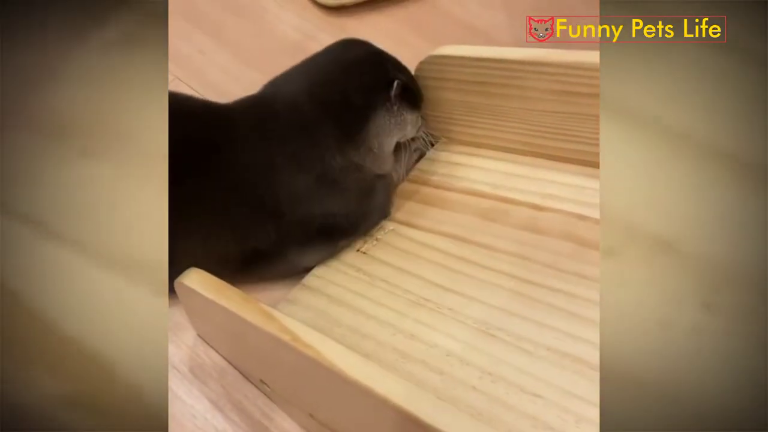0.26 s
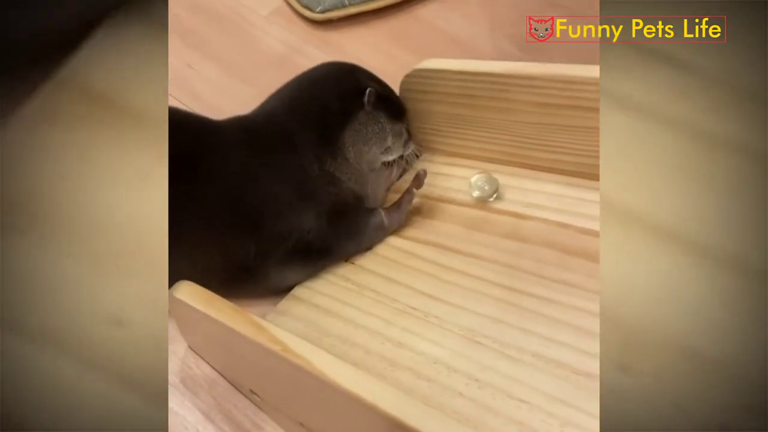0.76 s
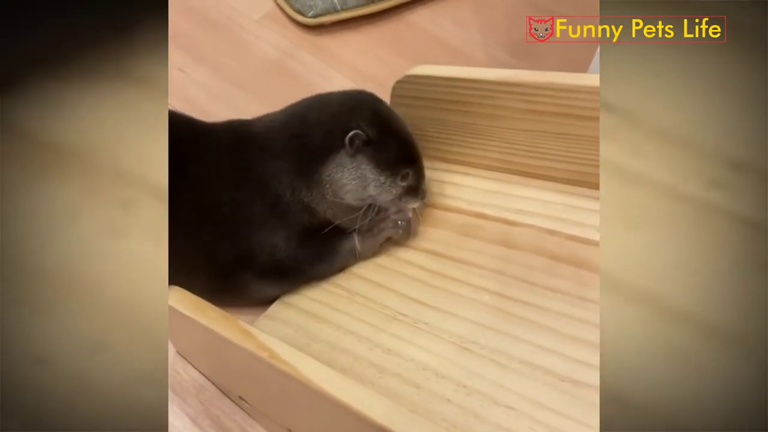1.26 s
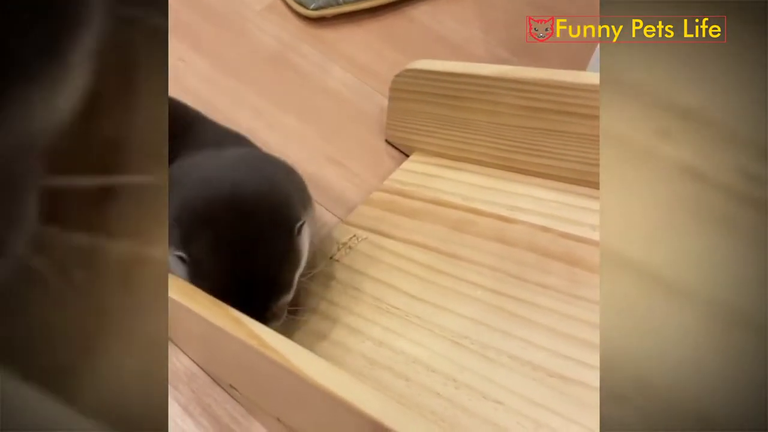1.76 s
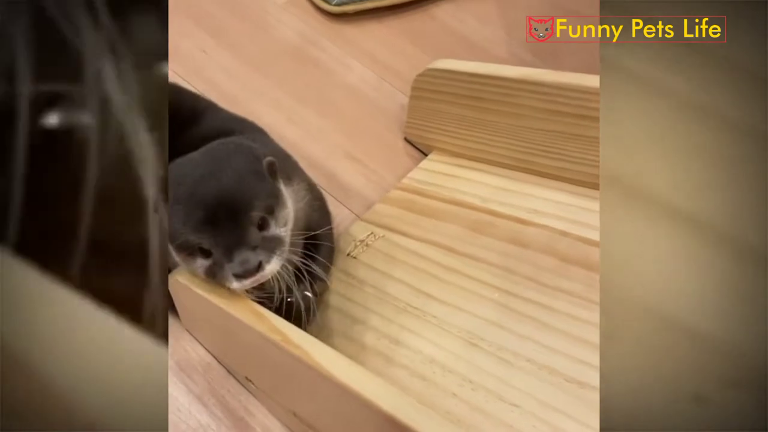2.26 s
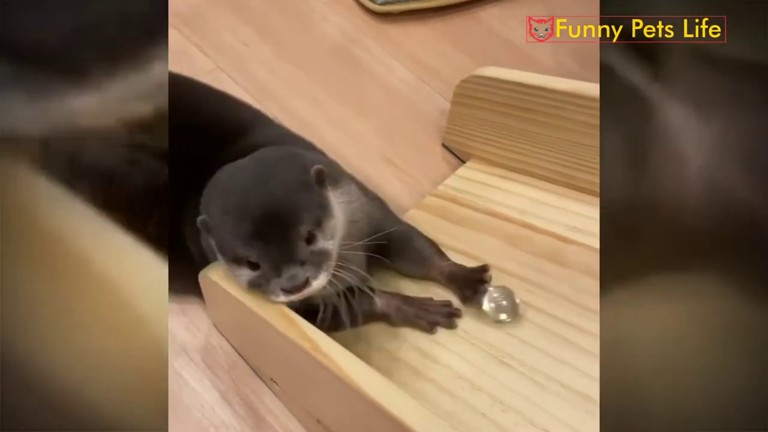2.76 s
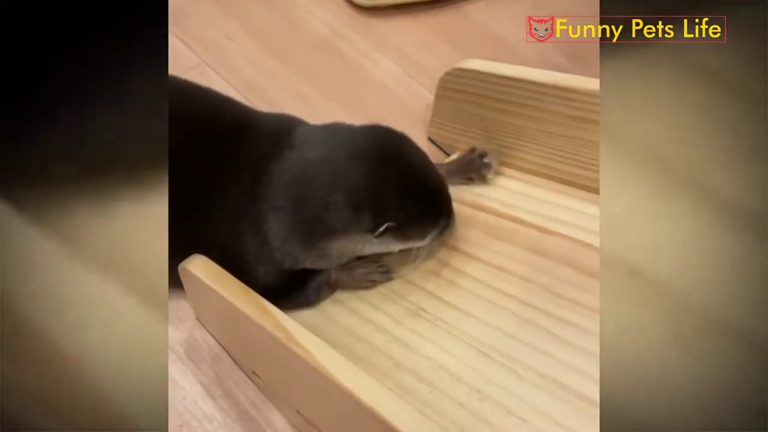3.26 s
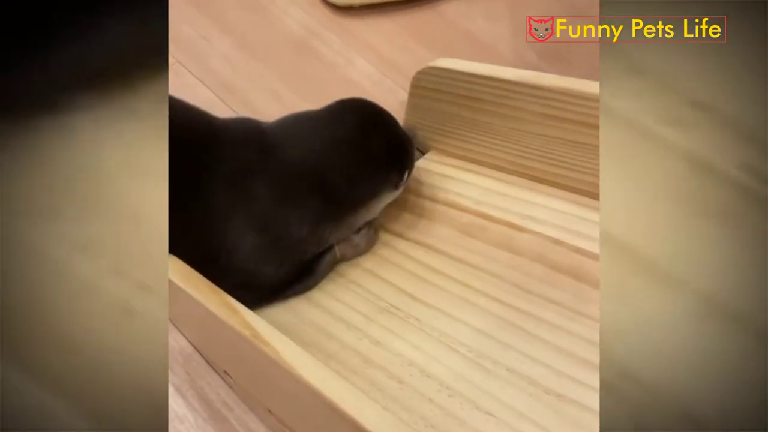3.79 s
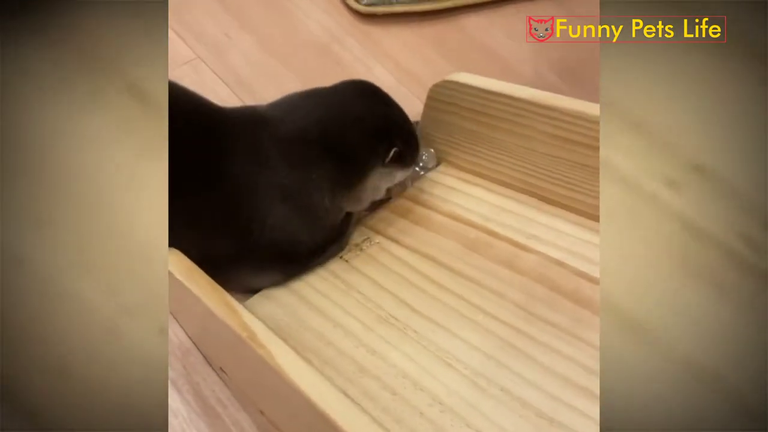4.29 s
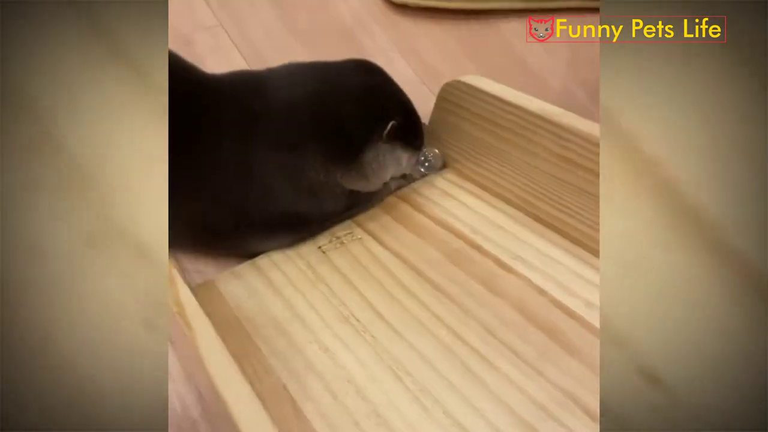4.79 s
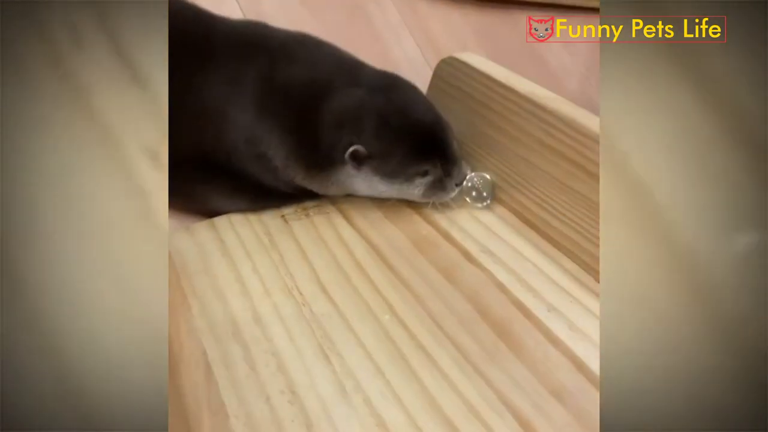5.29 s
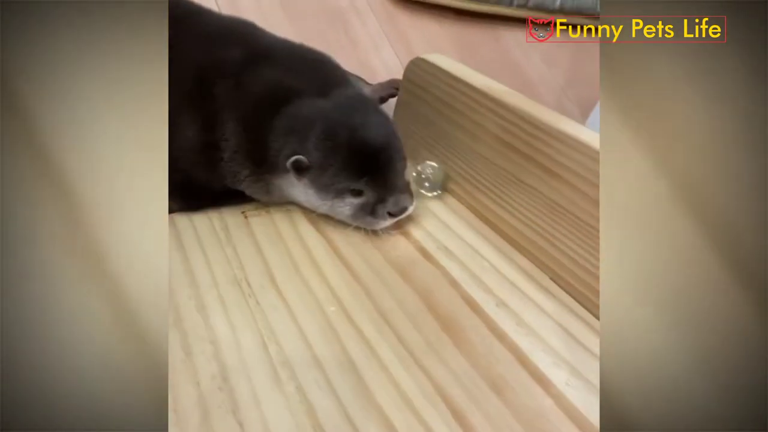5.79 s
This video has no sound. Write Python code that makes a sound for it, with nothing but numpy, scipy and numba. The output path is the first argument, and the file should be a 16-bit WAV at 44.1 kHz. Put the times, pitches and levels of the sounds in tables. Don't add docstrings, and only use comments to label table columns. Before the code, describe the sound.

Close up in a small quiet room, a hard glass ball rattles on resonant wood. Two bright clicks come early, a few woody knocks follow, and the board rumbles and rings as the ball is pushed. It grows louder near the halfway point, breaks into separate sharp knocks with quiet gaps, then rolls in short bursts. Dry claw scrapes and faint fur rustle run underneath.

```python
import sys
import numpy as np
from scipy import signal
from scipy.fft import rfft, irfft, next_fast_len
from scipy.io import wavfile
from scipy.ndimage import uniform_filter1d
from numba import njit

SR = 44100
rng = np.random.default_rng(int(sys.argv[2]) if len(sys.argv) > 2 else 0)


def master_out(mix):
    frames = np.transpose(np.atleast_2d(mix))
    ceiling = np.clip(frames, -1, 1)
    pcm = np.round(ceiling * 32767).astype(np.int16)
    wavfile.write(sys.argv[1], SR, pcm)


def gain_from_db(level_db):
    decades = np.asarray(level_db, float) / 20
    return 10 ** decades


N = 266212
HZ = np.fft.rfftfreq(next_fast_len(N), 1 / SR) + 1

# frequency in Hz, level in dB per Hz.
ROOM_TONE = [(12, -36), (20, -20.5), (360, 0.5), (447, -36), (527, -6.5), (1160, -13.5), (1950, -26),
             (5200, -30), (8260, -29), (10300, -45.5), (13500, -43.5)]
ROOM_TONE_DB, HUM_DB = -56, -58

# peak in seconds,
# rise in seconds, fall in seconds, level in dB, paw weight in dB.
ROLLS = [(0.018, 0.073, 0.13, -26.5, -8.5), (.11, 0.074, 0.13, -32, -12),
         (.32, 0.046, 0.081, -45.5, 1.5), (.59, 0.1, 0.088, -33.5, 6.5),
         (0.686, 0.144, 0.012, -30, -1.5), (0.822, 0.037, 0.17, -32, -5.5),
         (.885, 0.15, 0.059, -37.5, 7), (.95, 0.048, 0.047, -36.5, 9), (1.098, 0.082, 0.1, -29.5, 1),
         (1.289, 0.037, .2, -18.5, -1.5), (1.349, 0.11, 0.14, -25, 6.5),
         (1.44, 0.25, 0.041, -27, -9), (1.62, 0.046, 0.12, -31, -2), (1.712, 0.26, 0.1, -30, 1.5),
         (1.78, 0.044, 0.75, -52, 0.5), (2.065, 0.049, 0.21, -43, -2), (2.144, 0.1, 0.077, -43, 2),
         (2.349, 0.11, 0.15, -36, -3), (2.51, .12, .1, -43.5, -11), (2.618, 0.098, 0.13, -29, -9),
         (2.736, 0.13, 0.16, -26.5, 0.5), (2.918, 0.15, 0.34, -28, 2.5),
         (3.039, 0.11, 0.048, -22, -1), (3.154, .035, 0.17, -16.5, -1.5),
         (3.235, 0.15, 0.058, -29.5, -7), (3.43, .15, 0.4, -38, -10), (3.47, 0.094, 0.096, -51, -13),
             (3.525, 0.086, 0.14, -45, -5), (3.95, .05, .08, -54.5, -7), (4.847, 0.045, 0.046, -28, -9),
             (4.879, 0.054, 0.034, -40, 7.5), (5.023, 0.084, 0.087, -27.5, 0.5),
             (5.061, 0.091, 0.38, -37, 3), (5.374, 0.18, 0.16, -45.5, -4), (5.519, 0.43, 0.02, -48, -7),
             (5.698, 0.043, 0.11, -29, 3.5), (5.754, 0.0055, 0.14, -22, 0.5),
             (5.85, 0.17, 0.11, -32.5, 5.5), (5.893, .012, 0.083, -22, -1), (5.96, .02, 0.029, -47, 3),
             (6.025, 0.035, .1, -30, 1.5)]
# frequency in Hz, width in Hz, level in dB.
MIDDLE_TONES = [(244, 96, 0.5), (340.3, 70, 6), (520, 10, 8), (656, 44, 9), (776, 71, 5.5), (1034, 43, -4),
                (1390, 25, -17), (1660, 52, -3.5), (2170, 80, -16.5)]
RIM_TONES = [(232.4, 74, -2), (380, 16, -6.5), (521.3, 15, 8), (993, 120, -8), (1341, 18, 1.5),
             (1580, 58, -15), (2060, 31, -20), (2540, 58, -39), (2920, 81, -59), (3100, 25, -40.5)]
RIM_FROM_S = 3.6
# time in seconds, centre in Hz.
SLIDE = [
    [(.5, 495), (.636, 673), (.992, 684), (1.05, 392), (1.16, 394), (1.21, 486), (1.382, 396), (1.45, 537)],
    [(2.05, 469), (2.188, 509), (2.31, 820), (2.39, 580), (2.51, 660), (2.65, 543), (2.75, 344),
     (3.066, 316), (3.24, 322)],
]
SLIDE_DB = -2.5
ROLL_RASP_DB, ROLL_HISS_DB = -15, -34.5

# peak in seconds, rise in seconds, fall in seconds, level in dB.
SCRATCHES = [(.005, .05, 0.11, -44), (0.14, .015, 0.029, -38.5), (0.252, 0.11, 0.21, -63.5),
             (.33, 0.14, 0.082, -50.5), (.59, 0.055, 0.061, -53), (1.301, 0.05, 0.36, -41.5),
             (1.714, 0.12, 0.04, -45.5), (1.8, .1, 0.2, -57), (2.14, 0.6, 0.034, -66),
             (2.35, 0.049, 0.083, -55), (2.619, .13, 0.25, -53), (2.74, 0.27, 0.075, -56),
             (3.0, 0.13, .1, -50.5), (3.16, 0.085, 0.37, -44.5), (4.0, .035, 0.08, -59),
             (4.11, .025, 0.014, -50), (4.298, .1, 0.19, -58.5), (4.6, 0.18, 0.28, -55.5),
             (4.769, 0.9, 0.091, -55), (5.023, 0.043, 0.065, -50.5), (5.37, 0.197, 0.15, -70.5),
             (5.65, 0.037, 0.33, -54.5), (5.753, 0.011, 0.086, -44.5), (5.8, .03, 0.12, -44.5),
             (5.893, 0.035, .05, -46), (6.018, 0.012, 0.018, -34.5)]
# frequency in Hz, level in dB per Hz.
CLAW_HISS = [(1760, -3.5), (3000, 1), (4430, -5), (4900, -4.5), (7760, -9.5), (9970, -14.5), (12000, -25),
             (12800, -44), (13500, -34.5)]
SCRATCH_LOW_DB = 1.5
# peak in seconds, rise in seconds, fall in seconds, level in dB.
SHIFTS = [(.6, .2, 0.13, -72), (1.9, .9, .5, -72), (2.14, .5, 0.1, -69.5), (2.45, .2, 0.77, -73.5),
          (3.0, 1.2, 0.55, -68.5), (4.75, .5, 0.14, -69.5)]
FUR_DB, FUR_FOLLOWS = -62, 0.35
STROKE_RANGE_DB = 23

# start in seconds, peak in dB, strongest ring in Hz,
# glassy part in dB, time for the ring to drop 60 dB in seconds.
KNOCKS = [(0.025, -16, 577, -7.5, 0.028), (0.14, -4.5, 2920, 0, 0.082), (0.168, -11, 2780, -3.5, 0.028),
          (0.453, -3.5, 758, -23.5, 0.044), (0.902, -8.5, 777, -26.5, 0.099), (1.47, -2, 1390, -11, 0.028),
          (3.253, -2.5, 1300, -4.5, 0.032), (3.306, -14.5, 1240, -16, 0.12), (3.605, 0, 857, -6, 0.022),
          (3.896, -20.5, 760, -20, 0.079), (4.112, -7.5, 1390, -18.5, 0.071), (4.123, -4, 3070, 0.5, 0.086),
          (4.383, -12.5, 775, -16.5, 0.084), (4.432, -11.5, 824, -25.5, .021), (4.459, -6, 1520, -9, .1),
          (4.48, -5, 2790, -21.5, 0.029), (4.491, -5, 2670, -2, 0.084), (5.931, -0.5, 708, -10, .022),
          (6.014, -12.5, 633, -15, 0.083)]
# start in seconds, peak in dB, strongest ring in Hz, glassy part in dB.
BUMPS = [(0.324, -26, 616, -9), (0.814, -35, 664, -38), (0.841, -25, 730, -35), (1.109, -24, 369, -36),
         (1.292, -19.5, 363, -6), (1.67, -26, 750, -19), (2.324, -34, 846, -28), (2.606, -18.5, 550, -31),
         (2.696, -18, 460, -18), (2.735, -26, 354, -14), (3.025, -12, 308, -24), (3.149, -12, 710, -31),
         (4.001, -41.5, 577, 0), (4.84, -26, 510, -13), (4.985, -23.5, 520, -14), (5.689, -27, 343, -6),
         (5.75, -46, 530, -27), (5.799, -46, 501, -18), (5.89, -24, 527, -18)]
# lowest in Hz, highest in Hz.
PLATE_RANGE = (177.8, 7000)
CHATTER_S = [0.0035, .009]
KNOCK_THUD_DB, BUMP_THUD_DB, BUMP_T60_S = -20.5, -11, 0.048
FOCUS_DB, FOCUS_OCTAVES = 2, 0.11
SETTLE_DB, SETTLE_S = -32.5, 0.21
SETTLE_BOOM_DB, SETTLE_RASP_DB, SETTLE_HISS_DB = -12.5, -5, -28

# frequency in Hz, time to drop 60 dB in seconds.
ROOM_T60 = [(150, 0.33), (1000, 0.42), (3000, 0.31), (8000, 0.22)]
# frequency in Hz, lead in radians.
PORT_LEAD = [(0, 0), (860, -0.7), (2070, 0.0), (2580, 1.6), (3620, 0.4), (3960, 1.0), (5000, -0.0),
             (5600, 0.1), (6460, 2.9), (8610, 3.3), (8870, 3.1), (9730, 6.1), (12300, 6.4), (13200, 10.2)]
# frequency in Hz, difference in dB.
PORT_TILT = [(60, 11), (110, 4), (200, -1), (360, -2), (660, -4.5), (1190, -7), (2170, -1), (3940, -4),
             (7170, 13), (13000, -2.5)]


def on_log(table, hz):
    f, v = np.transpose(table)
    return np.interp(np.log(hz), np.log(np.maximum(f, 1)), v)


def level(x, db):
    return x * gain_from_db(db) / np.sqrt(np.mean(x ** 2))


def shape(x, gain):
    size = next_fast_len(N)
    return irfft(rfft(x, size) * gain, size)[..., :N]


def band(x, lo_hz, hi_hz):
    return signal.sosfilt(signal.butter(3, [lo_hz, hi_hz], "band", fs=SR, output="sos"), x)


def walk(rate):
    hold = int(SR / rate)
    steps = np.repeat(rng.standard_normal(N // hold + 1), hold)
    return 1.79 * uniform_filter1d(uniform_filter1d(steps, hold), hold)[:N]


def air():
    mid, side = rng.standard_normal((2, N))
    gain = gain_from_db(on_log(ROOM_TONE, HZ))
    side = shape(side, gain * np.clip(HZ / 900, 0.2, 1))
    both = shape(mid, gain) + side * np.array([[1], [-1]])
    return level(both, ROOM_TONE_DB) * gain_from_db(2.3 * walk(2.0))


def rumble():
    mid, side = band(rng.standard_normal((2, N)), 50, 130)
    both = mid + 0.037 * side * np.array([[1], [-1]])
    return level(both, HUM_DB) * gain_from_db(0.86 * walk(0.5))


def strokes(s, rise, fall, db):
    dt = np.arange(0, N + 64, 32) / SR - s[:, None]
    before = -dt / np.maximum(rise, 0.002)[:, None]
    after = dt / np.maximum(fall, 0.002)[:, None]
    return gain_from_db(db[:, None] - STROKE_RANGE_DB * np.maximum(before, after))


def blend(*gains):
    total = np.sqrt(sum(np.sum(g ** 2, axis=0) for g in gains))
    return np.interp(np.arange(N), np.arange(len(total)) * 32, total)


def patchy(x, lo_hz, hi_hz, count, patchy_db):
    edges = np.geomspace(lo_hz, hi_hz, num=count + 1)
    return sum(band(x, a, b) * gain_from_db(patchy_db * walk(30)) for a, b in zip(edges, edges[1:]))


def grain(rate, spread_db):
    where, size, fine = rng.random(N), rng.exponential(size=N), rng.standard_normal(N)
    bumps = (where < rate / SR) * gain_from_db(spread_db * size) * np.sign(fine)
    return bumps + 0.11 * fine


def board(modes, drift_db, bed_db):
    force = grain(900, spread_db=2.0)
    out = gain_from_db(bed_db) * signal.lfilter([1], [1, -0.9], force) / 10
    for hz, width, db in modes:
        b, a = signal.iirpeak(hz, hz / np.clip(width, 15, 300), fs=SR)
        out = out + gain_from_db(db + drift_db * walk(14)) * signal.lfilter(b, a, force)
    return out


@njit
def svf(x, hz, width):
    y, b, l = np.empty(len(x)), 0., 0.
    for i in range(len(x)):
        g, k = np.tan(np.pi * hz[i] / SR), width / hz[i]
        v = (b + g * (x[i] - l)) / (1 + g * (g + k))
        b, l, y[i] = 2 * v - b, l + 2 * g * v, k * v
    return y


def sliding_ring():
    t = np.arange(N) / SR
    s, hz = np.concatenate(SLIDE).T
    ring = level(svf(grain(900, spread_db=1.5), np.interp(t, s, hz), 44.0), SLIDE_DB)
    return ring * ((t < 1.46) | ((t > 2.05) & (t < 3.24)))


def wooden_tray():
    middle = level(board(MIDDLE_TONES, drift_db=2.5, bed_db=-13.5), 0) + sliding_ring()
    rim = level(board(RIM_TONES, drift_db=1.04, bed_db=-13), 0)
    return np.where(np.arange(N) / SR < RIM_FROM_S, level(middle, 0), rim)


def claws_on_wood(hiss, scratch):
    claws = shape(grain(2500, spread_db=0.0), gain_from_db(on_log(CLAW_HISS, HZ)))
    high = level(patchy(claws, 2964, 13500, count=7, patchy_db=4.0), 0) * hiss
    return high + level(band(claws, 1200, 2900), SCRATCH_LOW_DB) * scratch


def fur(roll):
    rustle = patchy(rng.standard_normal(N), 9000, 13300, count=3, patchy_db=2.5)
    shifting = blend(strokes(*np.transpose(SHIFTS)))
    return level(rustle, 0) * (gain_from_db(FUR_DB) * roll ** FUR_FOLLOWS + shifting)


def rolling():
    s, rise, fall, db, weight_db = np.transpose(ROLLS)
    roll = strokes(s, rise, fall, db)
    scratch = strokes(*np.transpose(SCRATCHES))
    s, db = np.transpose(KNOCKS)[:2]
    settle = strokes(s, 0 * s, 0 * s + SETTLE_S, db + SETTLE_DB)

    boom = blend(roll * gain_from_db(weight_db)[:, None], settle * gain_from_db(SETTLE_BOOM_DB))
    ring = blend(roll, settle)
    rasp = blend(roll * gain_from_db(ROLL_RASP_DB), settle * gain_from_db(SETTLE_RASP_DB))
    hiss = blend(roll * gain_from_db(ROLL_HISS_DB), scratch, settle * gain_from_db(SETTLE_HISS_DB))

    out = claws_on_wood(hiss, blend(scratch)) + fur(blend(roll))
    wood = wooden_tray()
    out = out + level(band(wood, 150, 450), 0) * boom
    out = out + level(band(wood, 450, 1200), 0) * ring
    dulled = signal.lfilter([1], [1, -1.7, 0.74], wood)
    out = out + level(patchy(dulled, 1273, 2970, count=4, patchy_db=1.6), 0) * rasp
    return out * gain_from_db(0.32 * walk(35))


def plate_ring(t, ring_hz, hard_db, t60, thud_db, chance):
    hz = np.geomspace(*PLATE_RANGE, num=48)[:, None] * (1 + 0.028 * chance[1])
    late = np.maximum(t - 1.415 / hz, 0)
    octaves = np.log2(hz / ring_hz)
    above, below = np.maximum(octaves, 0), np.minimum(octaves, 0)
    softness = np.clip(-hard_db / 12, 0, 3)
    weight_db = 1.1 * chance[0] - 1.6 * above + 8.5 * below - 3.6 * softness * above
    weight_db = weight_db - 26.8 * np.maximum(np.log2(hz / max(ring_hz, 2400)), 0)
    thud = gain_from_db(thud_db - 6.0 + 2.0 * chance[0]) * (hz < 450)
    focus = gain_from_db(FOCUS_DB) * np.exp(-(octaves / FOCUS_OCTAVES) ** 2)
    weight = gain_from_db(weight_db) + thud + focus
    decay = np.clip(t60, 0.01, 0.15) * (700 / hz) ** 0.56
    fade = np.exp(-np.log(1000) * late / decay) * np.minimum(late * hz, 1)
    ring = np.sin(2 * np.pi * hz * late) * fade
    return np.sum(weight * np.sign(chance[2]) * ring, axis=0)


def glassy_crack(t, noise, chance):
    glassy = signal.butter(2, [1500, 3400], "band", fs=SR, output="sos")
    click = signal.sosfilt(glassy, noise) + 0.19 * signal.lfilter([0.5], [1, -0.55], noise)
    fade = 0.3 * gain_from_db(-60 * t / 0.054)
    for k, at in enumerate([0] + CHATTER_S):
        fade = fade + gain_from_db(2.4 * chance[0, k] - 60 * (t - at) / 0.0036) * (t >= at)
    return click * fade


def knocks():
    out, t = np.zeros(N + 4096), np.arange(3072) / SR
    hard = [(*k, KNOCK_THUD_DB) for k in KNOCKS]
    soft = [(*b, BUMP_T60_S, BUMP_THUD_DB) for b in BUMPS]
    for s, peak_db, ring_hz, hard_db, t60, thud_db in sorted(hard + soft):
        chance = rng.standard_normal((3, 48, 1))
        body = plate_ring(t, ring_hz, hard_db, t60, thud_db, chance)
        crack = glassy_crack(t, rng.standard_normal(len(t)), chance)
        blow = body / np.max(np.abs(body)) + gain_from_db(hard_db - 1.0) * crack / np.max(np.abs(crack))
        i = int(s * SR)
        out[i:i + len(t)] += gain_from_db(peak_db) * blow
    return out[:N]


def room(x, wet_db):
    t, tail = np.arange(SR // 2) / SR, 0
    for hz in 150 * 2. ** np.arange(7):
        shared, own = rng.standard_normal(len(t)), rng.standard_normal((2, len(t)))
        apart = np.clip(hz / 350, 0, 2.2)
        fade = gain_from_db(-60 * t / on_log(ROOM_T60, hz))
        tail = tail + band(shared + apart * own, hz / 1.336, hz * 1.44) * fade
    tail = tail * np.clip((t - 0.004) / 0.0046, 0, 1)
    tail = level(tail, wet_db) / np.sqrt(len(t))
    return signal.fftconvolve(x[None], tail, axes=1)[:, :N]


def scene():
    no_bass = signal.butter(5, 165, "high", fs=SR, output="sos")
    tray = signal.sosfilt(no_bass, knocks() + rolling())
    lead = np.interp(HZ, *np.transpose(PORT_LEAD))
    left = gain_from_db(on_log(PORT_TILT, HZ) / 2) * np.exp(0.5j * lead)
    direct = np.array([shape(tray, left), shape(tray, 1 / left)])
    return direct + room(tray, wet_db=-10.0) + air() + rumble()


def band_limit(x):
    return signal.sosfilt(signal.butter(12, 13640, fs=SR, output="sos"), x)


def record(dry):
    dip_db = -6.0 * np.exp(-((HZ - 7600) / 1100) ** 2)
    fade_db = -5.1 * np.clip(HZ / 12500, 0, 2) ** 4
    heard = shape(dry, gain_from_db(dip_db + fade_db))
    return band_limit(np.tanh(1.3 * heard) / 1.2)


dry = scene()
out = record(dry)
master_out(out)
```